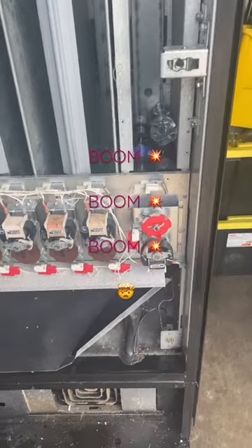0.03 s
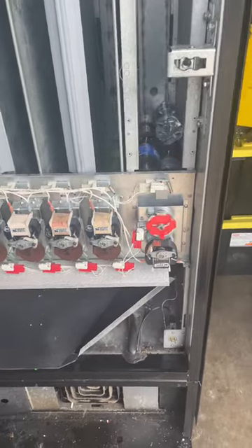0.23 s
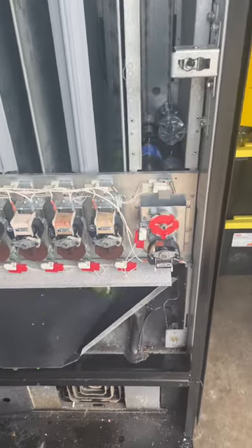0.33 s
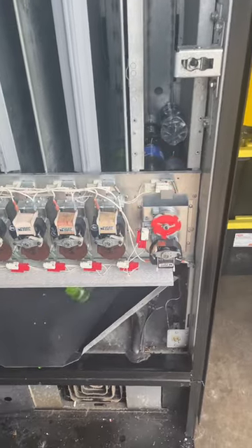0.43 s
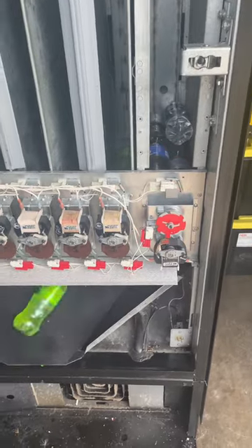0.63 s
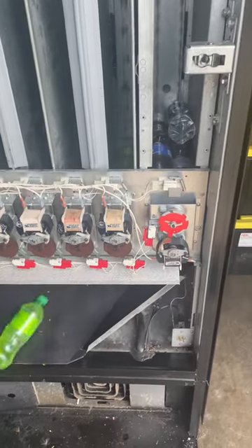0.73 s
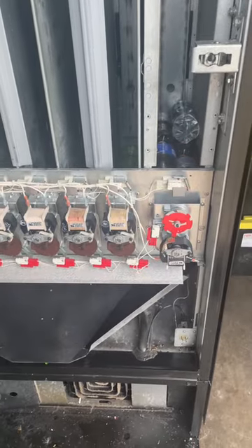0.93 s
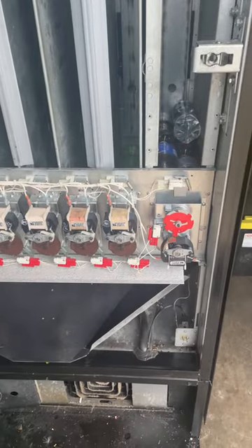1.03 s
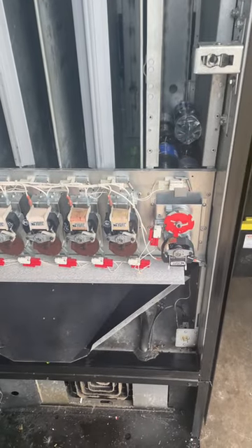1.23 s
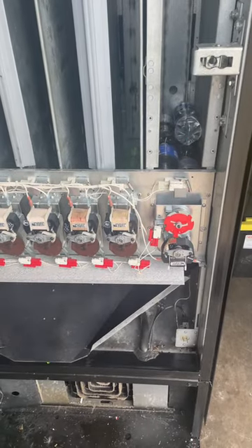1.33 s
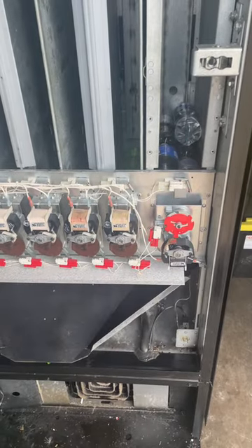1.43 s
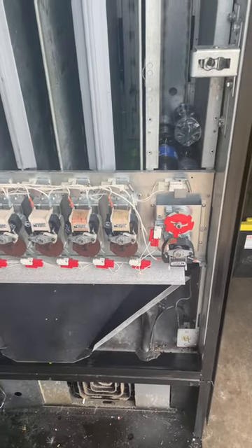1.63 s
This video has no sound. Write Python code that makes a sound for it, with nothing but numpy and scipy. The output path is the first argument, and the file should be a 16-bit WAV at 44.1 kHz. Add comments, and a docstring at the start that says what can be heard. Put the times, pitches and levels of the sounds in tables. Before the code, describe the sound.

A plastic bottle thuds and clatters down inside a steel vending machine over a low hum.

```python
"""A full plastic bottle tumbles down inside an open steel vending machine, slides along the chute
and lands in the tray. Each impact excites the modes of the steel and of the hollow cabinet, so the
cabinet booms and the panels clang; sliding friction adds a grainy hiss and a low rumble.
The release mechanism and loose metal click, and a refrigeration motor hums underneath."""
import sys
import numpy as np
from scipy import signal
from scipy.fft import rfft, irfft
from scipy.io import wavfile
from scipy.ndimage import uniform_filter1d

SR = 44100
rng = np.random.default_rng(int(sys.argv[2]) if len(sys.argv) > 2 else 0)


def pcm_store(signal):
    """Save signal as 16-bit PCM."""
    levels = np.round(np.clip(np.atleast_2d(signal), -1, 1) * 32767)
    wavfile.write(sys.argv[1], SR, levels.astype(np.int16).T)


N = 74970
TIME = np.arange(N) / SR
BAND_EDGES_HZ = 28 * 2 ** (np.arange(29) / 3)
BAND_CENTRES_HZ = np.sqrt(BAND_EDGES_HZ[1:] * BAND_EDGES_HZ[:-1])

# Likeness of the noise in the two channels: frequency_hz, correlation
COHERENCE = [(60, .999), (200, .999), (400, 0.96), (700, 0.59), (1400, 0.79), (3000, 0.76), (7000, 1),
             (15000, 1)]
# Motor hum, and the whine before and after the mechanism lets go: pitch_hz, level_db
HUM_TONES = [(118.4, -49.5), (140.0, -45.5), (187.5, -45.5)]
VENDING_TONES = [(818, -60), (840, -57), (1061, -58), (1175, -63), (1421, -68)]
IDLE_TONES = [(845.2, -62), (1141, -80), (1437, -74)]
# Third-octave spectra of fan and room, friction, chute rumble, blows and clicks: frequency_hz, level_db
FAN_SPECTRUM = [(25, -63.5), (50, -61), (80, -66), (130, -49), (200, -55.5), (300, -68.5), (600, -67.5),
                (900, -62), (1500, -72.5), (3000, -70), (5000, -81), (8000, -87), (11000, -108),
                (16000, -104)]
FRICTION_SPECTRUM = [(200, -20), (500, -14.5), (1050, -9.5), (1800, -10), (3000, -7), (5500, -6),
                     (8000, -14.5), (11000, -49.5), (15000, -31.5)]
RUMBLE_SPECTRUM = [(30, -26), (50, -12), (70, 0.5), (110, -9), (180, -8.5), (280, -8.5), (500, -18),
                   (1000, -24.5), (3000, -35.5)]
BLOW_SPECTRUM = [(30, -24), (48, -13), (70, -3), (110, -7), (180, -10.5), (300, -10.5), (560, -11),
                 (950, -7.5), (1400, -12.5), (2200, -11.5), (3300, -7.5), (5000, -8), (8000, -10),
                 (11000, -38), (15000, -17.5)]
CLICK_SPECTRUM = [(60, -3.5), (300, -13), (600, -14), (1400, -7), (2200, -10.5), (3300, -6.5), (6000, -3),
                  (8500, -0.5), (11500, -2.5), (15000, -4)]
# Envelopes of the bottle rubbing and drumming on the chute: time_s, level_db
FRICTION_ENVELOPE = [(0, -54.5), (.08, -50.5), (.115, -47.5), (.15, -50), (.23, -52.5), (.45, -51),
                     (.65, -58.5), (.72, -51), (.795, -51), (.83, -63.5), (.88, -90), (.935, -68),
                     (.955, -36.5), (.99, -43), (1.022, -39.5), (1.06, -52), (1.15, -75), (1.7, -72)]
RUMBLE_ENVELOPE = [(0, -87), (.1, -52), (.14, -45), (.23, -47), (.6, -40), (.68, -45), (.8, -39),
                   (.86, -46), (.93, -49), (1.2, -58.5), (1.7, -61)]
# Impacts of the bottle on sheet metal: start_s, boom_db, thud_db, clang_db, crack_db, note_hz, note_db,
# drum_hz, drum_db, drum_t60_s, lower_cavity_db, upper_cavity_db
BOTTLE_IMPACTS = [(0.2353, -51, -36, -24.5, -30.5, 983, -31.5, 68, -52, 0.15, -42.5, -39),
                  (0.2395, -31.5, -25, -26.5, -33.5, 686, -31, 67.4, -41.5, 0.15, -18, -15),
                  (0.2536, -32, -18.5, -23.5, -29.5, 486, -21.5, 67, -22, 0.14, -7.5, -10),
                  (0.287, -24, -16.5, -23.5, -26.5, 3568, -18, 62.3, -11.5, 0.16, -32, -17),
                  (0.303, -30.5, -11, -24, -30, 111, -9.5, 61, -13.5, 0.11, -22, -39),
                  (0.3193, -23.5, -21, -19, -28, 425, -16, 143, -10, 0.1, -10, -10),
                  (0.3396, -29, -18.5, -20, -33.5, 980, -38, 66.6, -7.5, 0.15, -16.5, -8.5),
                  (0.392, -31, -40, -27.5, -44.5, 349, -21, 54.6, -18.5, 0.14, -28, -16),
                  (0.404, -34, -28.5, -37.5, -52, 890, -32, 149.7, -16.5, 0.12, -11.5, -51),
                  (0.449, -28.5, -25.5, -45, -55, 336, -25.5, 57.6, -14.5, 0.25, -20, -27.5),
                  (0.511, -32, -42.5, -36.5, -61, 494, -35.5, 64.5, -18, 0.15, -21, -41),
                  (0.527, -27.5, -38, -42, -60, 156, -17, 64.8, -19, 0.14, -20, -34.5),
                  (0.640, -33.5, -42, -48, -58, 139, -37, 76.5, -24, 0.35, -42, -51),
                  (0.9396, -38, -31.5, -29.5, -42.5, 1070, -27.5, 57.5, -22.5, 0.32, -22, -32.5),
                  (0.949, -33, -21.5, -36, -48, 261, -19.5, 124, -28, 0.11, -28, -22.5),
                  (0.999, -35, -22, -28.5, -37.5, 146, -27, 54, -46, 0.2, -23, -33),
                  (1.014, -35, -41, -43, -53, 740, -29, 52.5, -25, 0.2, -36, -31),
                  (1.0291, -27, -27.5, -32.5, -28, 880, -21, 52.7, -20, 0.34, -32, -26),
                  (1.048, -33, -38, -48, -66, 153, -27, 53, -33, 0.3, -24, -26.5),
                  (1.086, -43, -43, -60, -70, 147.6, -23, 50, -40, 0.21, -39, -37.5)]
# Impacts of latches and loose metal: start_s, knock_db, ring_db, clink_db, snap_db, sizzle_db,
# note_hz, note_db, note_t60_s
METAL_IMPACTS = [(0.288, -71, -17, -23, -28.5, -25.5, 2830, -17, 0.048),
                 (0.508, -53, -47.5, -35, -31.5, -24, 3250, -33, 0.044),
                 (0.5403, -46, -49, -38.5, -42.5, -47, 4900, -35, 0.035),
                 (0.5569, -49, -43, -30.5, -32.5, -24, 2860, -47, 0.079),
                 (0.5611, -53, -48, -27, -56, -46, 1039, -39.5, 0.17),
                 (0.577, -56, -52, -39, -59, -52, 2420, -41.5, 0.063),
                 (1.301, -34.5, -41.5, -44, -47.5, -62, 320, -36, 0.23),
                 (1.370, -32, -33.5, -33, -31, -63, 2530, -38, 0.066),
                 (1.5195, -43.5, -43.5, -51.5, -54.5, -79, 1640, -49.5, 0.072),
                 (1.5606, -37.5, -37.5, -36.5, -44.5, -52, 1102, -34, 0.038),
                 (1.586, -47, -49, -52, -57, -64, 1482, -42.5, 0.13),
                 (1.676, -39, -45.5, -45, -51.5, -81, 3260, -53, 0.095),
                 (1.690, -50, -41, -46, -57, -76, 340, -35, 0.1)]
# Frequencies of the columns boom to crack, and knock to sizzle
BLOW_DRIVE_HZ, CLICK_DRIVE_HZ = [70, 270, 900, 3600], [300, 1300, 2700, 5500, 14000]
# Two-stage decay of the cabinet, before decay_scale: frequency_hz, early_t60_s, tail_t60_s, tail_db
CABINET_DECAY = [(50, 0.28, 1, -16.5), (150, 0.13, 0.66, -3.5), (314, 0.19, 0.63, -7),
                 (880, 0.097, 0.44, -9.5), (2900, 0.049, 0.22, -5), (6900, 0.056, 0.18, -6),
                 (14900, 0.042, 0.16, -27)]
# The two boxy resonances of the hollow cabinet: pitch_hz, t60_s
CAVITY_MODES = [(205, 0.078), (308, 0.082)]
# Modes of the steel panels, and of the latches and loose parts: pitch_hz, level_db, t60_s
PANEL_MODES = [(52.3, -16, 0.76), (70, -9.5, 0.25), (156, -9.5, 0.45), (200.3, -12, 0.16),
               (309, -13.5, 0.42), (336, -17.5, 0.27), (390.2, -8.5, 0.22), (441.3, -11.5, 0.19),
               (491, -15.5, 0.13), (746.6, -12, 0.19), (990, -11, 0.19), (1403, -18.5, 0.12),
               (2028, -9, 0.1)]
LATCH_MODES = [(372.6, -9, 0.17), (691, -13.5, 0.11), (1027, -19.5, 0.086), (1450, -21, 0.099),
               (1540, -14.5, 0.093), (2356, -22, 0.15), (2570, -15, 0.088), (2830, -28, 0.07),
               (2880, -13, 0.16), (3570, -23, 0.091), (5880, -10.5, 0.058)]


def from_db(db):
    """Amplitude grows tenfold for every 20 decibels."""
    return 10 ** (np.asarray(db) / 20)


def at_hz(table, hz, column=1):
    """Spectral curves are interpolated on a logarithmic frequency axis."""
    table = np.array(table)
    return np.interp(np.log(hz), np.log(table[:, 0]), table[:, column])


def wander(smoothing_s):
    """Averaging white noise twice leaves a smooth fluctuation, scaled here to unit power."""
    size = max(int(smoothing_s * SR), 2)
    drift = rng.standard_normal(N)
    for _ in range(2):
        drift = uniform_filter1d(drift, size, mode="wrap")
    return drift / np.sqrt(np.mean(drift ** 2) + 1e-20)


def noise_bands():
    """The ratio of mid to side power sets the stereo coherence of each third-octave noise band."""
    bands = []
    for low, high, hz in zip(BAND_EDGES_HZ, BAND_EDGES_HZ[1:], BAND_CENTRES_HZ):
        bandpass = signal.butter(2, [low, high], "band", fs=SR, output="sos")
        noise = signal.sosfilt(bandpass, rng.standard_normal((2, N + SR // 2)))[:, -N:]
        running_power = uniform_filter1d(noise ** 2, int(2 * SR / (high - low)))
        mid, side = noise / np.sqrt(running_power + 1e-20)
        alike = np.clip(at_hz(COHERENCE, hz), 0, 1)
        bands.append(np.sqrt((1 + alike) / 2) * mid + np.sqrt((1 - alike) / 2) * np.array([side, -side]))
    return bands


def coloured_noise(spectrum):
    """Weighted bands superpose into steady stereo noise of a given spectrum."""
    return sum(from_db(at_hz(spectrum, hz)) * band for hz, band in zip(BAND_CENTRES_HZ, noise_bands()))


def wavering(tones, depth, smoothing_s):
    """Random amplitude and phase modulation spreads each tone into a narrow band."""
    out = 0
    for hz, db in tones:
        amplitude = np.sqrt(2) * from_db(db) * (1 + depth * wander(smoothing_s))
        phase = 2 * np.pi * (hz * TIME + rng.random()) + depth * wander(smoothing_s)
        out += amplitude * np.sin(phase)
    return out


def motor_hum(release_s=0.2, fade_s=0.12):
    """Motor tones beat over broadband fan noise; the whine changes pitch as the bottle is let go."""
    released = np.clip((TIME - release_s) / fade_s, 0, 1)
    vending = wavering(VENDING_TONES, depth=0.4, smoothing_s=0.06)
    idle = wavering(IDLE_TONES, depth=0.4, smoothing_s=0.06)
    hum = wavering(HUM_TONES, depth=0.22, smoothing_s=0.063)
    return hum + (1 - released) * vending + released * idle + coloured_noise(FAN_SPECTRUM)


def bottle_slide(grain_db=2.0, grain_s=0.0013):
    """Sliding friction of plastic on steel makes grainy noise and drives the chute into a low rumble."""
    friction_db = np.interp(TIME, *np.transpose(FRICTION_ENVELOPE)) + grain_db * wander(grain_s)
    rumble_db = np.interp(TIME, *np.transpose(RUMBLE_ENVELOPE))
    friction = from_db(friction_db) * coloured_noise(FRICTION_SPECTRUM)
    return friction + from_db(rumble_db) * coloured_noise(RUMBLE_SPECTRUM)


def excitation(impact, drive_hz, hz):
    """The spectrum of an impact sets how strongly it drives each frequency."""
    return from_db(np.interp(np.log(hz), np.log(drive_hz), impact[1:1 + len(drive_hz)]))


def cabinet_clatter(impacts, drive_hz, spectrum, rise_cycles, decay_scale):
    """Densely overlapping modes act as noise with a two-stage decay; separate impacts add in power."""
    out = 0
    for hz, band in zip(BAND_CENTRES_HZ, noise_bands()):
        early_t60, tail_t60, tail_db = (at_hz(CABINET_DECAY, hz, column) for column in (1, 2, 3))
        early = from_db(-60 * TIME / (decay_scale * early_t60))
        tail = from_db(tail_db - 60 * TIME / (decay_scale * tail_t60))
        rise = 1 - np.exp(-TIME * hz / rise_cycles)
        power_response = (early ** 2 + tail ** 2) * rise ** 2
        power = np.zeros(N)
        for impact in impacts:
            start = int(impact[0] * SR)
            power[start:] += excitation(impact, drive_hz, hz) ** 2 * power_response[:N - start]
        out += from_db(at_hz(spectrum, hz)) * np.sqrt(power) * band
    return out


def resonator(impulses, hz, t60, rise_cycles=0.9):
    """The difference of two damped oscillations is a tone that swells briefly, then decays."""
    omega = 2 * np.pi * hz / SR
    loss = np.log(1000) / (t60 * SR)
    slow, fast = (signal.lfilter([0, r * np.sin(omega)], [1, -2 * r * np.cos(omega), r * r],
                                 impulses + 1e-18)
                  for r in np.exp([-loss, -loss - hz / (rise_cycles * SR)]))
    return slow - fast


def metal_ringing(impacts, drive_hz, modes, overtones=36, overtone_db=-21, spread_db=3):
    """Modal superposition: each impact rings strong modes and weak overtones in its own proportions."""
    overtone_hz = np.geomspace(804.2, 8465, overtones) * np.exp(0.03 * rng.standard_normal(overtones))
    weak_modes = [(hz, overtone_db, 0.19 * (hz / 1000) ** 0.011) for hz in overtone_hz]
    out = np.zeros((2, N))
    for hz, db, t60 in list(modes) + weak_modes:
        impulses = np.zeros(N)
        for impact, scatter_db in zip(impacts, spread_db * rng.standard_normal(len(impacts))):
            impulses[int(impact[0] * SR)] = excitation(impact, drive_hz, hz) * from_db(db + scatter_db)
        pan_db = -1.5 * min(hz / 1000, 1) * rng.standard_normal()   # low modes stay near the centre
        out += from_db([[pan_db], [-pan_db]]) * resonator(impulses, hz, t60)
    return out


def struck_tone(start_s, hz, db, t60):
    """A mode struck once vibrates freely at its natural frequency."""
    return from_db(db) * resonator(np.arange(N) == int(start_s * SR), hz, t60)


def bottle_blows():
    """Impact excitation: each blow rings the struck spot, drums a panel and drives cavity resonances."""
    out = cabinet_clatter(BOTTLE_IMPACTS, BLOW_DRIVE_HZ, BLOW_SPECTRUM, rise_cycles=1.6, decay_scale=0.94)
    out += metal_ringing(BOTTLE_IMPACTS, BLOW_DRIVE_HZ, PANEL_MODES)
    for start_s, *_, note_hz, note_db, drum_hz, drum_db, drum_t60, lower_db, upper_db in BOTTLE_IMPACTS:
        note_t60 = 0.063 * (note_hz / 1000) ** -0.32   # lower notes ring longer
        out += struck_tone(start_s, note_hz, note_db, note_t60)
        out += struck_tone(start_s, drum_hz, drum_db, drum_t60)
        for (hz, t60), db in zip(CAVITY_MODES, (lower_db, upper_db)):
            out += struck_tone(start_s, hz, db, t60)
    return out


def metal_clicks(tick_gain=2.12, tick_decay_s=0.00045):
    """A brief, hard contact has a wide spectrum: a sharp tick, then a short bright ring."""
    envelope = np.zeros(N)
    for start_s, _, _, _, snap_db, *_ in METAL_IMPACTS:
        start = int(start_s * SR)
        envelope[start:] += tick_gain * from_db(snap_db) * np.exp(-TIME[:N - start] / tick_decay_s)
    bandpass = signal.butter(2, [1500, 8000], "band", fs=SR, output="sos")
    ticks = signal.sosfilt(bandpass, envelope * rng.standard_normal(N) + 1e-18)
    body = cabinet_clatter(METAL_IMPACTS, CLICK_DRIVE_HZ, CLICK_SPECTRUM,
                           rise_cycles=2.4, decay_scale=0.7)
    notes = sum(struck_tone(start_s, hz, db, t60) for start_s, *_, hz, db, t60 in METAL_IMPACTS)
    return ticks + body + notes + metal_ringing(METAL_IMPACTS, CLICK_DRIVE_HZ, LATCH_MODES)


def scene(right_lag_s=0.000045):
    """The sources superpose and reach the right microphone a moment after the left."""
    left, right = bottle_blows() + metal_clicks() + bottle_slide() + motor_hum()
    delay = np.exp(-2j * np.pi * np.fft.rfftfreq(2 * N, 1 / SR) * right_lag_s)
    return np.array([left, irfft(rfft(right, 2 * N) * delay)[:N]])


def record(dry, low_cut_hz=40.6, high_cut_hz=17200):
    """Band limiting: the microphone drops the deepest bass, and the top is cut steeply."""
    highpass = signal.butter(4, low_cut_hz, "high", fs=SR, output="sos")
    lowpass = signal.cheby2(12, 70, high_cut_hz, fs=SR, output="sos")
    return signal.sosfilt(lowpass, signal.sosfilt(highpass, dry))


dry = scene()
out = record(dry)
pcm_store(out)
```